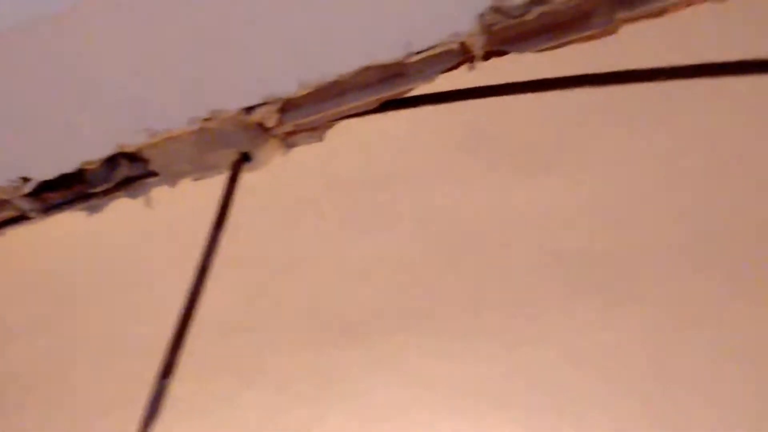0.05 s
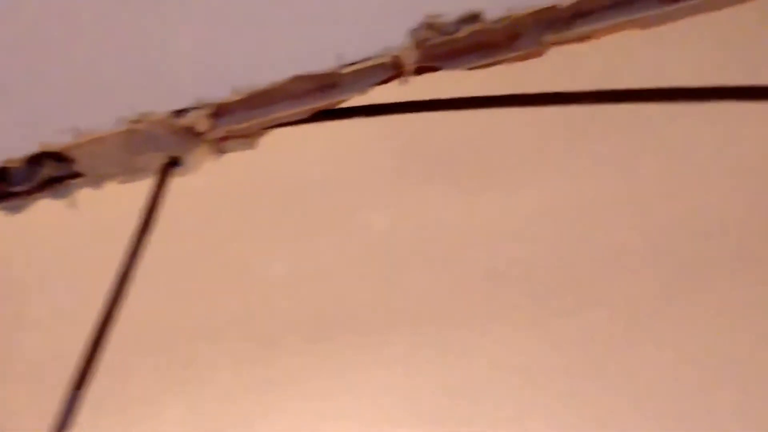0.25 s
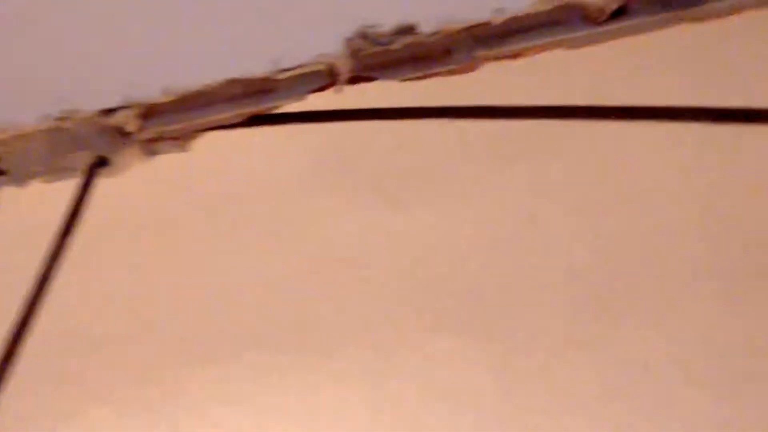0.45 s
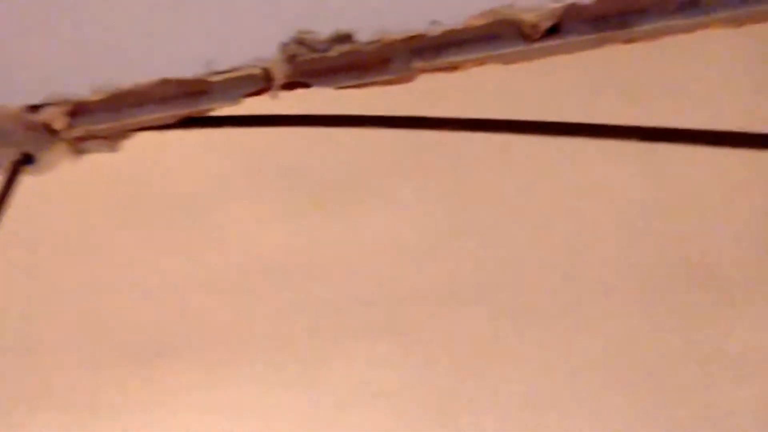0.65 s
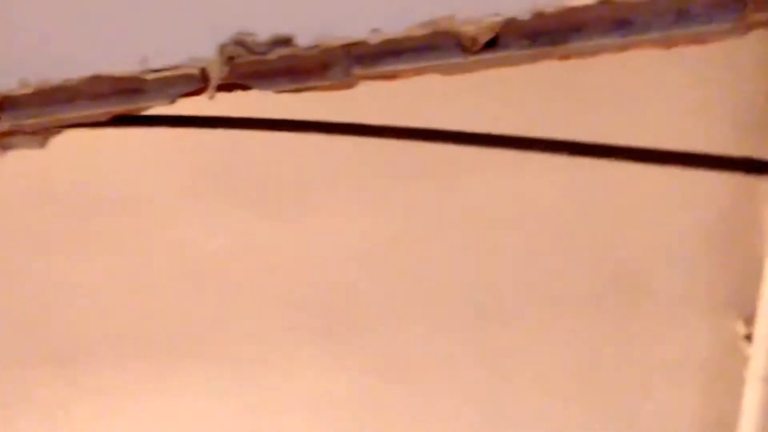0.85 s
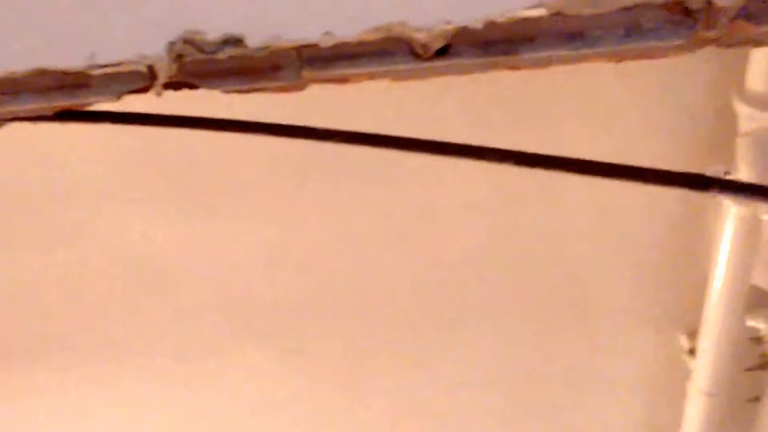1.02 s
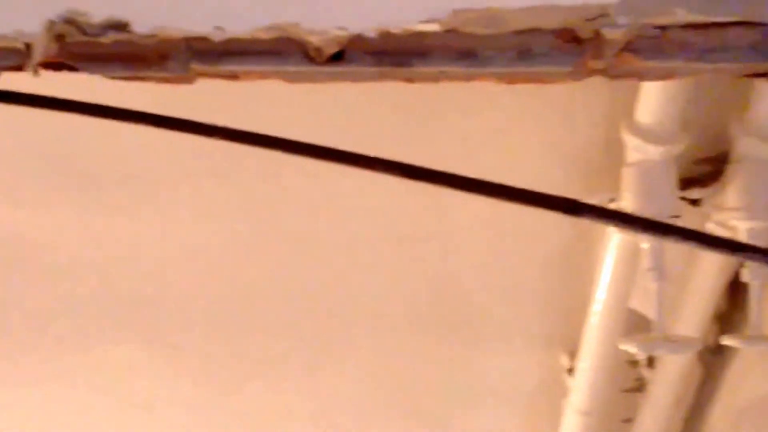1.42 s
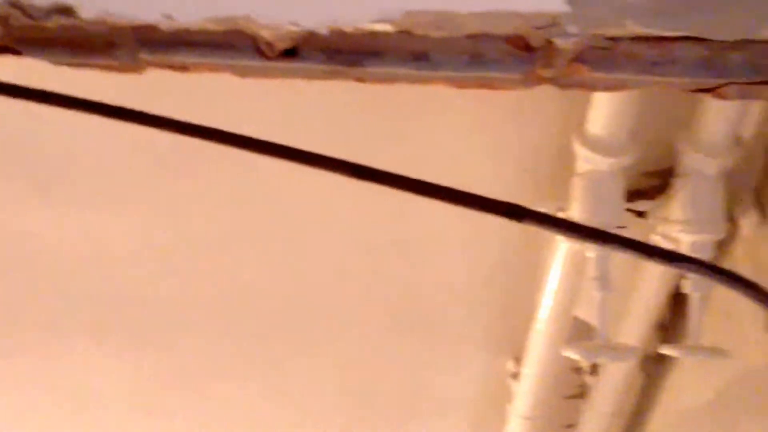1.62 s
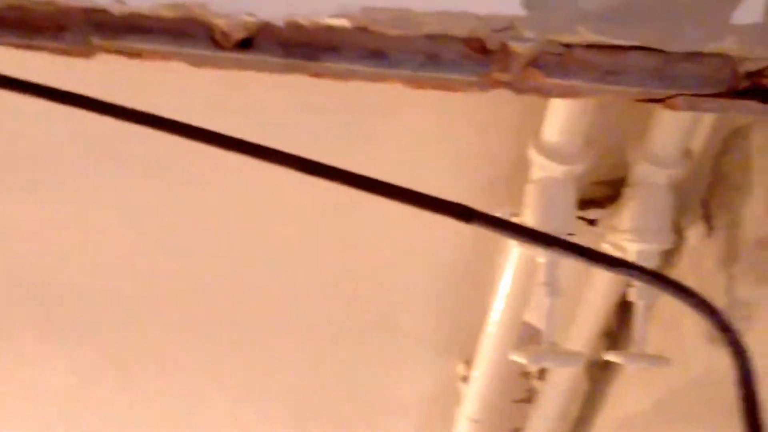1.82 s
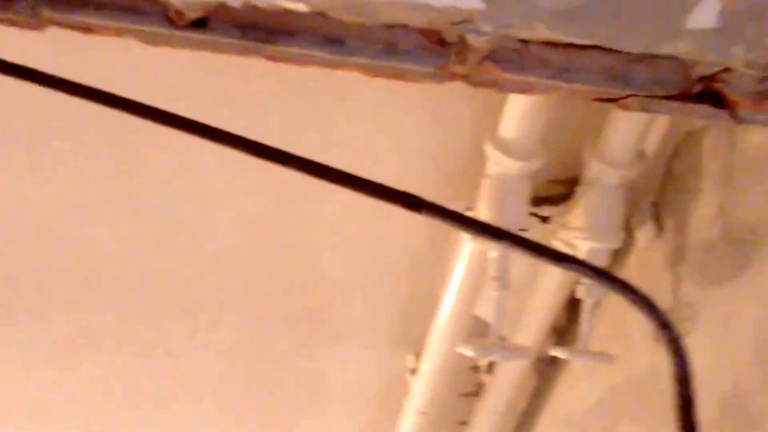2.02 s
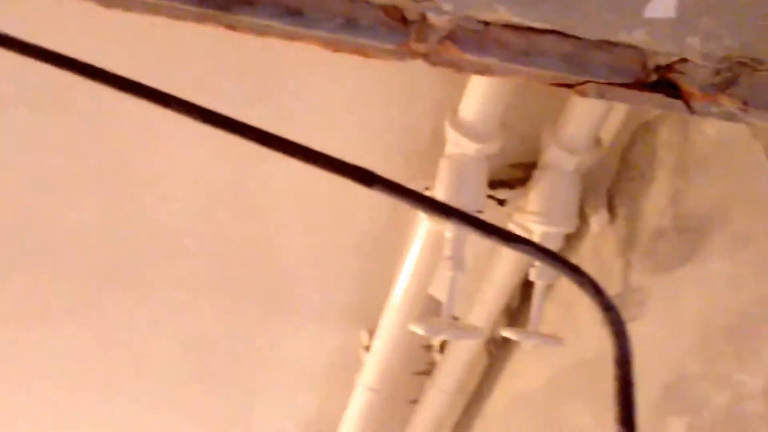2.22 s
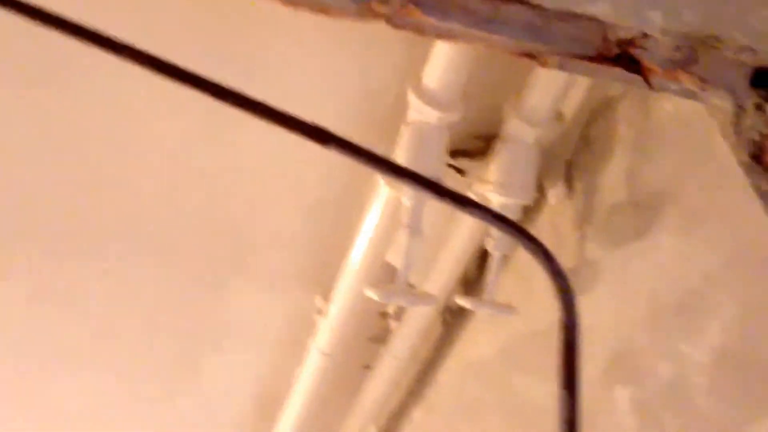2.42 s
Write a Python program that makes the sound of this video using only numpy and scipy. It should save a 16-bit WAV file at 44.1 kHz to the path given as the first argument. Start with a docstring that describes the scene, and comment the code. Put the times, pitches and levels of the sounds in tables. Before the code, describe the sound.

Four heavy hammer blows thud on a masonry wall, echoing as debris falls.

```python
"""A bare, echoing room, where four heavy hammer blows land on a masonry wall.
Each blow crushes plaster with a crack, thuds, and sets the modes of wall and room booming.
Between the blows tapped steel clinks, chips and pieces of brick hit the floor and grit
trickles, over a low electrical hum and still air."""
import sys
import numpy as np
from scipy import signal
from scipy.fft import rfft, irfft
from scipy.io import wavfile
from scipy.ndimage import uniform_filter1d

SR = 44100
rng = np.random.default_rng(int(sys.argv[2]) if len(sys.argv) > 2 else 0)


def dump(signal):
    """Clip the signal to [-1, 1] and save it as 16-bit WAV at the path in sys.argv[1]."""
    limited = np.clip(np.atleast_2d(signal).T, -1, 1)
    pcm = np.round(limited * 32767).astype(np.int16)
    wavfile.write(sys.argv[1], SR, pcm)


N = 112454

# tone shared by falling chips and crumbs (frequency [Hz], level [dB])
RUBBLE_SPECTRUM = [(150, -14), (700, 14), (1200, 11.5), (2600, 16), (4300, 3.5), (5800, 9), (10000, 5.5),
                   (12500, 0.5), (16000, -6)]


def amp(db):
    """Decibels to gain."""
    return 10 ** (np.asarray(db) / 20)


def unit(x):
    """Scales to rms 1."""
    return x / np.sqrt(np.mean(x ** 2) + 1e-20)


def curve(points, hz):
    """Reads an EQ curve on a log-frequency axis."""
    freqs, values = np.transpose(points)
    return np.interp(np.log(hz + 1), np.log(freqs + 1), values)


def bell(hz, centre_hz, octaves):
    """A bell curve around a pitch, 0-1."""
    return np.exp(-(np.log2((hz + 1) / centre_hz) / octaves) ** 2)


def add(mix, start_s, sound):
    """Mixes a sound in at a time."""
    part = mix[max(round(start_s * SR), 0):][:len(sound)]
    part += sound[:len(part)]


def colour(x, points):
    """Shapes a signal with an EQ curve, at rms 1."""
    return unit(irfft(rfft(x) * amp(curve(points, np.fft.rfftfreq(len(x), 1 / SR))), len(x)))


def grainy(grain_db):
    """One second of noise whose level jumps from millisecond to millisecond."""
    lumps = unit(uniform_filter1d(rng.standard_normal(SR), size=60))
    return unit(rng.standard_normal(SR) * amp(grain_db * lumps))


def room_decay(x, rise_s, hold_s=0):
    """Attack, hold, then each band fades at the room's rate."""
    # reverb time by band (frequency [Hz], t60 [s])
    reverb_times = [(60, 0.46), (160, .6), (420, 0.5), (1100, 0.41), (2900, 0.42), (7700, 0.46),
                    (14000, 0.27)]
    t, hz, spectrum = np.arange(len(x)) / SR, np.fft.rfftfreq(len(x), 1 / SR), rfft(x)
    centres, t60s = np.transpose(reverb_times)
    out = np.zeros(len(x))
    for share, t60 in zip(np.eye(len(centres)), t60s):
        band = irfft(spectrum * curve(np.c_[centres, share], hz), len(x))
        out += band * amp(-60 * np.maximum(t - hold_s, 0) / t60)
    return out * np.minimum(t / rise_s, 1)


def ring(modes, wet_db):
    """A small struck object: each mode sounds directly and lingers in the room."""
    t, out = np.arange(SR) / SR, np.zeros(SR)
    room = room_decay(rng.standard_normal(SR), rise_s=0.00067) * amp(-45 * t)  # extra damping, 45 dB/s
    for hz, db, t60 in modes:
        direct = amp(-60 * t / t60) * np.sin(2 * np.pi * hz * t)
        echo = signal.fftconvolve(direct, room)[:SR]
        echo *= np.linalg.norm(room) / np.linalg.norm(echo)
        out += amp(db) * (direct + amp(wet_db) * echo)
    return out


def room_tone():
    """Still air: a quiet, dark bed of noise."""
    # tone of the air (frequency [Hz], level [dB])
    air_spectrum = [(20, -7), (50, 12), (130, -4), (350, -7), (700, -7), (2600, -20.5), (4300, -29),
                    (9000, -31.5), (12500, -28), (16000, -31)]
    return amp(-47.5) * colour(rng.standard_normal(N), air_spectrum)


def hum():
    """Mains harmonics drone, their balance slowly drifting."""
    # partials of the hum (multiple of the mains pitch, starting rms level [dB], drift [dB/s])
    harmonics = [(1, -43.5, 0.5), (2, -59, 0.5), (3, -62, -1), (4, -51, -2), (5, -54.5, -1.5),
                 (8, -53.5, -0.5), (9, -54.5, 0), (10, -61, -0.5), (11, -55, 3), (13, -55.5, -6.5),
                 (26, -64, 2)]
    t, mains_hz = np.arange(N) / SR, 49.38
    return sum(amp(db + drift * t) * np.sqrt(2) * np.sin(2 * np.pi * (k * mains_hz * t + rng.random()))
               for k, db, drift in harmonics)


def grit():
    """Crumbs tick at random, and now and then a little grit slides."""
    # swells of sliding grit (middle [s], half length [s], level [dB])
    slides = [(0.642, 0.075, -43), (1.141, 0.043, -41), (1.396, 0.069, -53), (1.863, 0.069, -47),
              (2.24, .08, -76)]
    # tone of a slide (frequency [Hz], level [dB])
    slide_spectrum = [(300, 0), (700, 3.5), (1200, 6), (2500, -3), (4200, -11), (6000, -13), (10000, -10),
                      (16000, -30)]
    t, ticks_per_s = np.arange(N) / SR, 110
    ticks = (rng.random(N) < ticks_per_s / SR) * rng.standard_normal(N)
    room = room_decay(rng.standard_normal(SR), rise_s=0.0013)
    echo = signal.fftconvolve(ticks, room / np.linalg.norm(room))[:N]
    trickle = amp(-51) * colour(ticks + amp(6) * echo, RUBBLE_SPECTRUM)
    swell = sum(amp(db) * np.exp(-((t - middle) / half) ** 2) for middle, half, db in slides)
    return trickle + swell * colour(rng.standard_normal(N), slide_spectrum)


def chips():
    """Chips hit the floor and echo; the faster the attack, the harder the snap."""
    # landings, with EQ on top of the rubble tone
    # (time [s], low [dB], mid [dB], high [dB], resonance [Hz], its lift [dB], rise [s])
    landings = [(.453, -67, -62, -53.5, 3000, 4, .002), (.645, -47, -36.5, -40, 2620, 3.5, 0.0023),
                (.712, -48, -44.5, -38, 3560, 8.5, 0.0014), (1.379, -57, -45.5, -44, 2500, -1, .0006),
                (1.4436, -37, -42.5, -40, 3710, 13, 0.0006), (1.943, -78, -62, -54, 3460, 13, 0.0013),
                (2.06, -70, -65, -46.5, 2500, 9, 0.0017), (2.118, -48, -39.5, -40.5, 2740, -2.5, 0.0033),
                (2.324, -43.5, -41, -35, 2150, 7, 0.0035), (2.452, -46, -40.5, -40, 2600, 3, 0.0031)]
    bands_hz, sharp_rise_s, snap_s = [900, 2500, 8000], 0.0017, 0.0032
    t, hz, out = np.arange(SR) / SR, np.fft.rfftfreq(SR, 1 / SR), np.zeros(N)
    for start, *levels, resonance_hz, lift_db, rise_s in landings:
        eq_db = curve(RUBBLE_SPECTRUM, hz) + curve(np.c_[bands_hz, levels], hz)
        eq_db += lift_db * bell(hz, resonance_hz, octaves=0.18)
        chip = irfft(rfft(grainy(grain_db=2)) * amp(eq_db), SR)
        snap = amp(-11.5) * sharp_rise_s / rise_s * np.exp(-t / snap_s)
        add(out, start, room_decay(chip, rise_s) * (1 + snap))
    return out


def brick_knocks():
    """Larger pieces of brick knock on the floor and ring briefly."""
    # modes of a piece of brick (frequency [Hz], level [dB], t60 [s])
    brick_modes = [(760, -42, 0.042), (1170, -30.5, 0.04), (1330, -27.5, 0.027), (1455, -45, 0.016),
                   (1620, -28.5, 0.039)]
    # landings (time [s], gain [dB], pitch ratio)
    knocks = [(1.445, -6, 0.6), (2.456, -2, 1)]
    out = np.zeros(N)
    for start, db, ratio in knocks:
        modes = [(hz * ratio, level, t60) for hz, level, t60 in brick_modes]
        add(out, start, amp(db) * ring(modes, wet_db=-2.5))
    return out


def thin_rings():
    """A faint, thin ring of metal lingers twice: a narrow band of fading noise."""
    # rings (time [s], level [dB])
    onsets = [(0.456, -56), (1.626, -48.5)]
    pitch_hz, t60 = 5980, 0.76
    t, hz, out = np.arange(SR) / SR, np.fft.rfftfreq(SR, 1 / SR), np.zeros(N)
    for start, db in onsets:
        shimmer = unit(irfft(rfft(rng.standard_normal(SR)) * bell(hz, pitch_hz, octaves=0.03), SR))
        add(out, start, amp(db) * shimmer * amp(-60 * t / t60))
    return out


def steel_clinks():
    """Light taps on a piece of steel: a tick, a bright ring and a brief chatter around its modes."""
    # modes of the steel (frequency [Hz], level [dB], t60 [s])
    steel_modes = [(3440, -8, 0.033), (7545, -1.5, 0.089), (7660, -4.5, 0.021), (10076, 2.5, 0.043),
                   (12920, -17, 0.076)]
    # taps (time [s], gain [dB], tilt above the main mode [dB/octave], lift of the top mode [dB])
    taps = [(.016, -34, -1.5, -10), (0.712, -30.5, -3, -11), (.778, -31.5, -5, -9),
            (1.233, -26.5, -12, 15.5), (1.603, -37, -12, 5), (1.951, -38, -3, -9)]
    # tone of the contact (frequency [Hz], level [dB])
    tick_spectrum = [(1500, -16), (5500, 8), (10000, -6.5), (15000, -38)]
    main_hz, pivot_hz, top_above_hz, chatter_s = 7545, 7400, 12000, 0.03
    t, hz, out = np.arange(SR) / SR, np.fft.rfftfreq(SR, 1 / SR), np.zeros(N)
    for start, db, tilt, top_db in taps:
        modes = []
        for mode_hz, level, t60 in steel_modes:
            tilt_db = tilt * np.log2(max(mode_hz, main_hz) / pivot_hz)
            modes.append((mode_hz, level + tilt_db + top_db * (mode_hz > top_above_hz), t60))
        tick = room_decay(colour(grainy(grain_db=1.4), tick_spectrum), rise_s=0.00076)
        peaks = sum(amp(level) * bell(hz, mode_hz, octaves=0.031) for mode_hz, level, _ in modes)
        chatter = unit(irfft(rfft(rng.standard_normal(SR)) * peaks, SR)) * np.exp(-t / chatter_s)
        add(out, start, amp(db) * (ring(modes, wet_db=-5.5) + amp(-11) * tick + amp(-7.5) * chatter))
    return out


def wall_boom(favoured_hz, lift_db):
    """The modes of wall and room swell, low ones last, and beat against each other as they fade."""
    # modes of wall and room (frequency [Hz], level [dB], t60 [s])
    wall_modes = [(44.2, -33, 1.7), (69.1, -16, 1.08), (81.35, -10.5, 0.64), (101.9, -49, 1.5),
                  (128, -39, .55), (150.7, -22.5, 0.74), (191, -29, 0.3), (247.8, -17, 0.26),
                  (289.1, -20, 0.34), (311.5, -23, 0.44), (344.4, -20.5, 0.4), (386.3, -21, 0.25),
                  (425.6, -21, 0.39), (473.5, -26.5, 0.5), (519.5, -28.5, 0.49), (594, -31, 0.7),
                  (688, -31, 0.36)]
    delay_cycles, rise_cycles, hold_s, phase_delay_s = 0.56, 2.3, 0.012, 0.018
    t, out = np.arange(SR) / SR, np.zeros(SR)
    for k, (hz, db, t60) in enumerate(wall_modes):
        age = np.maximum(t - delay_cycles / hz, 0)
        gain = amp(db + lift_db * bell(hz, favoured_hz, octaves=0.2))
        swell = np.minimum(age * hz / rise_cycles, 1)
        fade = amp(-60 * np.maximum(age - hold_s, 0) / t60)
        out += (-1) ** k * gain * swell * fade * np.sin(2 * np.pi * hz * (t - phase_delay_s))
    return out


def hammer_blows():
    """The same spot is struck each time: a gritty crack, a dull thud, then the beating boom."""
    # hits (time [s], thud [dB], crack [dB], snap relative to the crack [dB], boom [dB],
    # favoured boom pitch [Hz], its lift [dB])
    hits = [(0.245, -16.5, -28, -1, 1, 262, 9), (0.766, -17, -32, 2, -1.5, 250, 5),
            (1.1431, -15, -28, 1, -0.5, 415, 7), (1.513, -16, -26.5, -5, -1, 330, -1)]
    # dull body of a blow (frequency [Hz], level [dB])
    thud_spectrum = [(30, -12), (90, 3.5), (170, -1.5), (260, 1), (440, -2), (600, -5.5), (900, -6),
                     (1100, -13), (1500, -12), (2700, -30.5), (4000, -39.5)]
    # crushing plaster (frequency [Hz], level [dB])
    crack_spectrum = [(300, -49), (1200, -4), (2700, 3), (4200, -11), (6000, -6), (8500, -7), (10500, -9),
                      (12500, -23.5), (16000, -37)]
    snap_s, touch_lead_s = 0.0054, 0.0028
    t, out = np.arange(SR) / SR, np.zeros(N)
    snap = np.exp(-t / snap_s)
    spot, alike = rng.standard_normal(SR), 0.45  # noise common to all thuds, and its share of the power
    for start, thud_db, crack_db, snap_db, boom_db, favoured_hz, lift_db in hits:
        body = np.sqrt(alike) * spot + np.sqrt(1 - alike) * rng.standard_normal(SR)
        thud = colour(body, thud_spectrum)
        crack = colour(grainy(grain_db=2), crack_spectrum) * (1 + amp(snap_db) * snap)
        add(out, start, amp(thud_db) * room_decay(thud, rise_s=0.0017, hold_s=0.031))
        add(out, start, amp(crack_db) * room_decay(crack, rise_s=0.0021, hold_s=0.023))
        add(out, start, amp(boom_db) * wall_boom(favoured_hz, lift_db))
        # the hammer touches loose plaster just before it lands
        touch = colour(grainy(grain_db=2), crack_spectrum) * snap
        add(out, start - touch_lead_s, amp(crack_db - 4) * touch)
    return out


def scene():
    """Everything in the room, in mono."""
    impacts = hammer_blows() + steel_clinks() + thin_rings() + chips() + brick_knocks()
    return (impacts + grit() + hum() + room_tone())[None]


def record(dry):
    """Deep rumble is cut, a limiter trims the blows, and a steep low-pass takes off the very top."""
    low_cut_hz, high_cut_hz = 25, 15850
    limit_db, release_db_per_s = -11, 200
    dry = signal.sosfilt(signal.butter(1, low_cut_hz, "highpass", fs=SR, output="sos"), dry)
    power_db = 10 * np.log10(abs(uniform_filter1d(dry[0] ** 2, size=300)) + 1e-12)
    release = np.arange(N) * release_db_per_s / SR
    envelope_db = np.maximum.accumulate(power_db + release) - release
    over_db = np.maximum(envelope_db - limit_db, 0)
    limited = dry * amp(-uniform_filter1d(over_db, size=100))
    lowpass = signal.firwin(511, high_cut_hz, window=("kaiser", 9), fs=SR)
    return signal.oaconvolve(limited, lowpass[None], "same")


dry = scene()
out = record(dry)
dump(out)
```